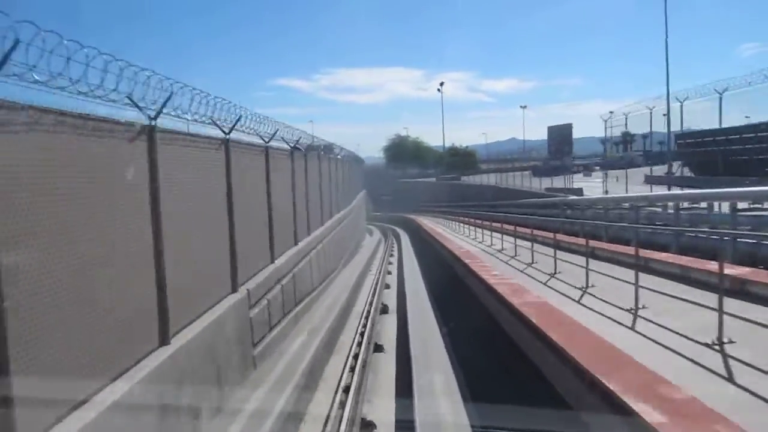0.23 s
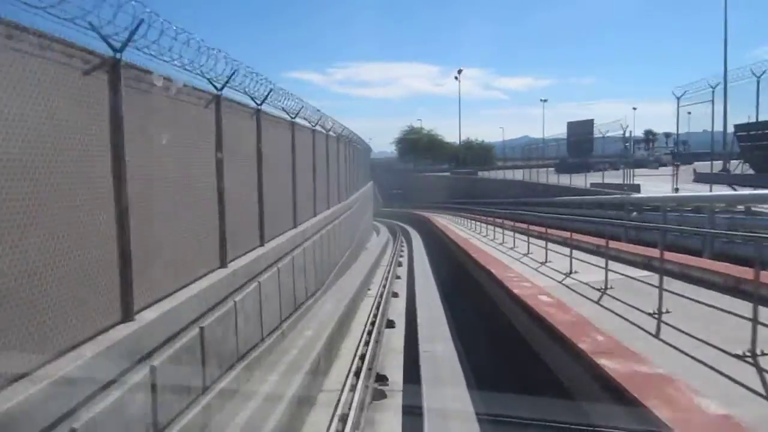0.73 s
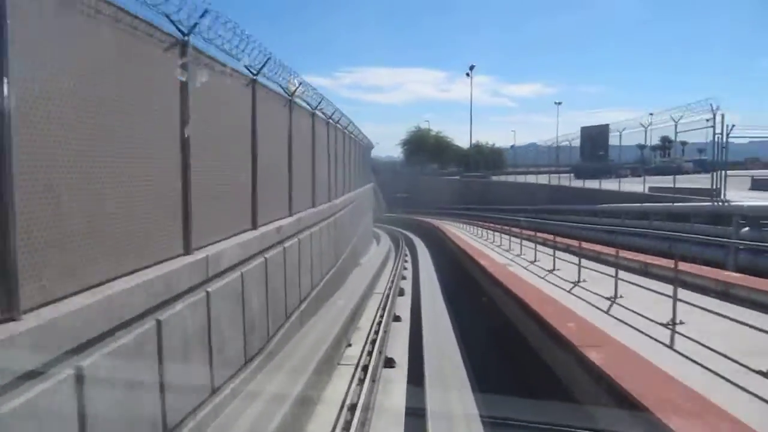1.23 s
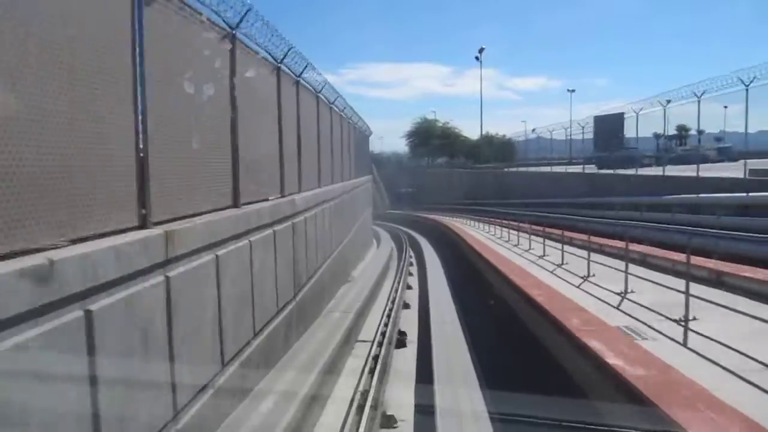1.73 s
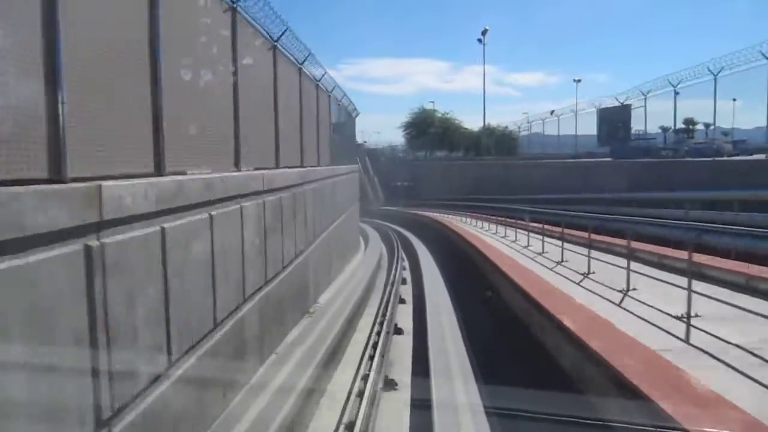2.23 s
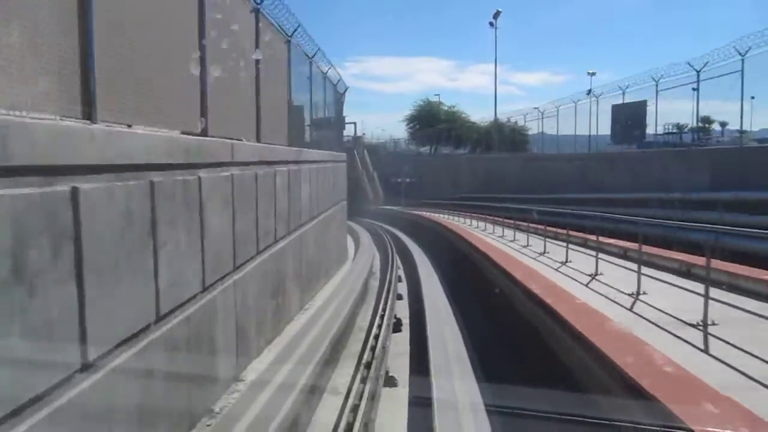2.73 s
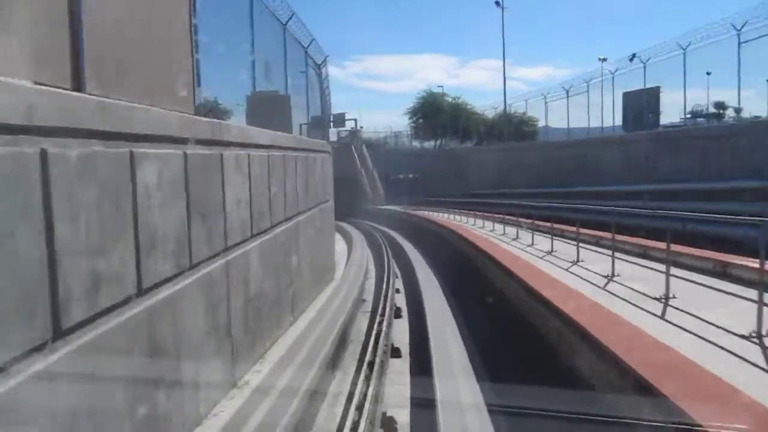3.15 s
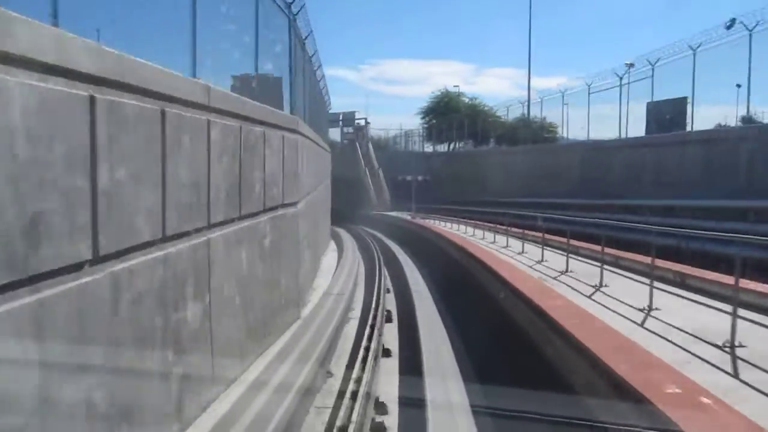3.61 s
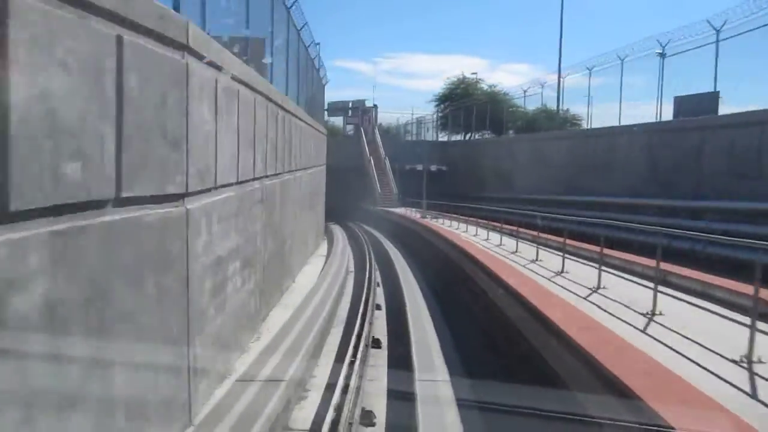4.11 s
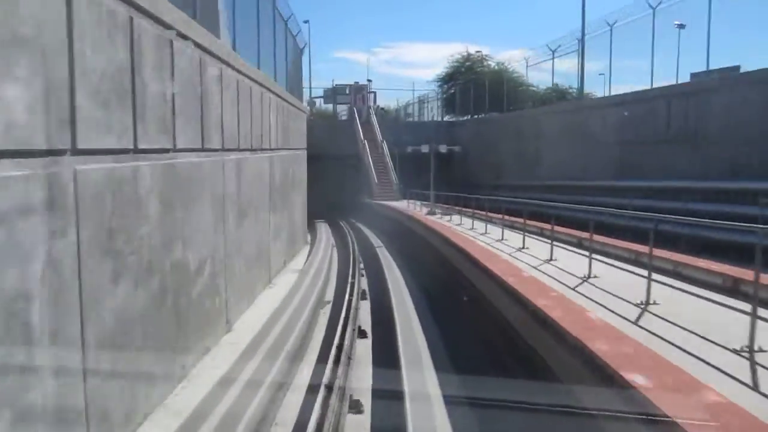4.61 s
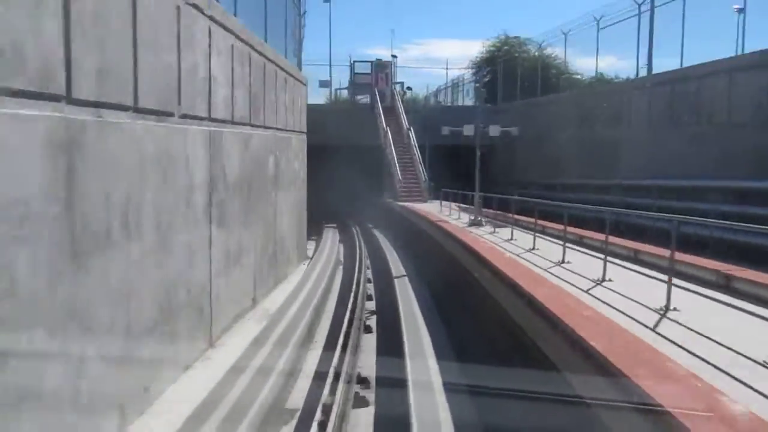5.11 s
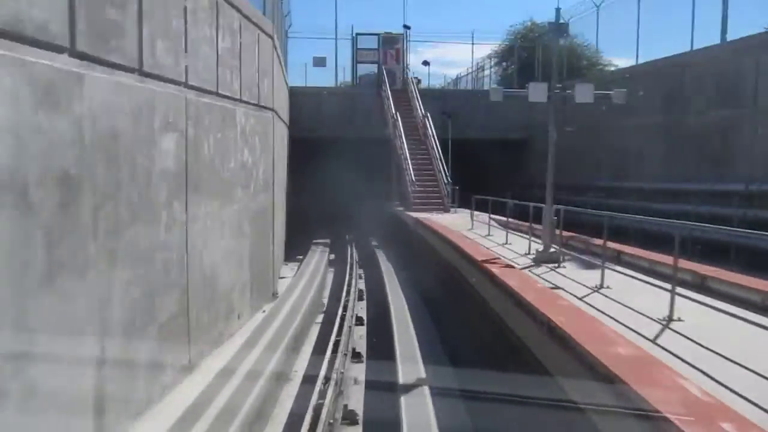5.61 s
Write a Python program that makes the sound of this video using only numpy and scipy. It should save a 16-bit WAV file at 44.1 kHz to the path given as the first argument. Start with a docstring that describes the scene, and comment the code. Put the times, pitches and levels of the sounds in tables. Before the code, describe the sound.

Steady rubber-tyred rolling rumble fills a tram cabin, with a throbbing electric drive whine, airy hiss, small bumps and faint trim ticks.

```python
"""Tyres rolling on a concrete guideway fill the inside of an airport tram at a nearly steady speed.
They shake the body into a deep rumble, raised by a few bumps, and a roar coloured by the cabin's panels.
Air rushes and hisses outside. All these are noises, each shaped by its own spectrum.
The drive gear whines over weaker hums, made of wavering tones that follow the running speed.
A thin steady tone comes from the power electronics; the trim ticks and chirps in short noise bursts."""
import sys
import numpy as np
from scipy import signal
from scipy.fft import rfft, irfft
from scipy.io import wavfile
from scipy.ndimage import uniform_filter1d

SR = 44100
rng = np.random.default_rng(int(sys.argv[2]) if len(sys.argv) > 2 else 0)


def wrap_up_sound(samples):
    """Save the sound to the file named by the first command line argument, as 16-bit audio."""
    columns = np.atleast_2d(samples).T
    # keep every value between -1 and 1, then stretch to whole-number steps
    tamed = np.clip(columns, -1, 1)
    steps = np.round(tamed * 32767).astype(np.int16)
    wavfile.write(sys.argv[1], SR, steps)


N = 258426
TIME, FREQS = np.arange(N) / SR, np.fft.rfftfreq(N, 1 / SR)

# running speed, as the rate at which the gear teeth mesh: (time [s], rate [Hz])
MESH = [(0, 686.8), (.8, 680), (1.5, 681.3), (2.5, 677.6), (3.4, 681.7), (4.4, 680), (5.3, 683),
        (5.86, 674)]
# load on the drive gear, heard as the strength of its whine before throbbing: (time [s], level [dB])
LOAD = [(0, -42), (.48, -28), (.66, -37), (.86, -29.5), (1.3, -31), (1.86, -28), (2.05, -20), (2.25, -24.5),
        (2.88, -22), (3.36, -26), (3.72, -37.5), (3.98, -27.5), (4.86, -30), (4.99, -20.5), (5.08, -33.5),
        (5.22, -23.5), (5.6, -24), (5.78, -37)]
# roughness of the concrete under the tyres: (time [s], roughness above its usual state [dB])
TRACK = [(0, .5), (.3, -0.2), (.6, -0.2), (1.25, -.5), (2.05, 0.8), (2.7, -0.2), (3.3, -.5), (4.3, .5),
         (4.9, 0.35), (5.12, -2.5), (5.45, -.7), (5.86, -0.8)]


def amp(db):
    """Turns decibels into a gain."""
    return 10 ** (np.asarray(db) / 20)


def unit(x):
    """Scales a signal to an rms (average strength) of one."""
    return x / np.sqrt(np.mean(abs(x) ** 2) + 1e-20)


def curve(rows):
    """Joins the points of a time table by straight lines."""
    return np.interp(TIME, *np.transpose(rows))


def shape(points):
    """Spreads a spectrum table over all frequencies, evenly in pitch rather than in Hz."""
    hz, value = np.transpose(points)
    return np.interp(np.log(FREQS + 1), np.log(abs(hz) + 1), value)


def wander(rate_hz):
    """Slow random motion of unit size, mostly below the given rate."""
    spectrum = rfft(rng.standard_normal(N))
    return unit(irfft(spectrum / (1 + (FREQS / rate_hz) ** 2), N))


def cabin_noise(colour_db):
    """Stereo noise of unit level: alike on both sides in the bass, ever less alike in the treble."""
    # likeness of left and right: (frequency [Hz], coherence [-1 to 1])
    likeness = [(30, 0.94), (70, 1), (140, 1), (210, 0.91), (330, 0.99), (700, 0.99), (1170, 0.87),
                (1790, 0.78), (2740, 0.4), (4200, 0.2), (9800, -0.042), (15000, -0.36)]
    left, other = rfft(rng.standard_normal((2, N)))
    same = np.clip(shape(likeness), -.998, .998)
    right = same * left + np.sqrt(1 - same ** 2) * other
    return unit(irfft(np.array([left, right]) * amp(colour_db), N))


def spell(start, length, taper):
    """A smooth swell from zero to one and back; taper is the share of the length spent rising."""
    u = np.clip((TIME - start) / length, 0, 1)
    to_nearest_end = np.minimum(u, 1 - u)
    return np.sin(np.pi / 2 * np.minimum(to_nearest_end / taper, 1)) ** 2


def tone(hz, flutter, flutter_hz):
    """A wavering tone of unit level: flutter (0-1) spreads a share of it close around its pitch."""
    share = np.clip(flutter, 0, 1)
    scatter = unit(wander(flutter_hz) + 1j * wander(flutter_hz))
    sway = np.sqrt(1 - share ** 2) + share * scatter
    turns = np.cumsum(hz * np.ones(N)) / SR + rng.random()
    return unit((sway * np.exp(2j * np.pi * turns)).real)


def rumble():
    """The car body booms on its tyres, more on rough concrete; a bump pushes it harder for a moment."""
    # colour of the boom: (frequency [Hz], relative level per Hz [dB])
    boom_colour = [(6, -38), (13, -14), (21, -4.5), (33, 0), (50, -1.5), (70, 0.5), (98, 1.5), (124, -4),
                   (140, -6.5), (165, -14.5), (230, -31.5), (500, -65)]
    usual_db, follow = -17.5, 1.36  # level on usual track, and dB per dB of roughness
    boom = cabin_noise(shape(boom_colour))
    # even out the slow swells over about 0.2 s, so that the track sets them
    boom /= np.sqrt(uniform_filter1d(boom[0] ** 2, size=9000))
    return boom * amp(usual_db + follow * curve(TRACK) + bump_jolts_db())


def roar():
    """Tyre noise on concrete, coloured by resonances of the cabin and gear housing."""
    # colour before the resonances: (frequency [Hz], relative level per Hz [dB])
    tyre_colour = [(90, -32), (170, 1.5), (195, 0), (210, 4), (230, 1.5), (290, -0.5), (325, -5), (370, -2),
                   (560, -1), (740, -3), (790, -4), (1100, -6), (1600, -12.5), (3000, -47.5)]
    # resonances, mostly lifting the roar: (centre [Hz], width at half the lift [Hz], lift [dB])
    panels = [(189, 37, 2.5), (213, 12.6, -5.5), (255, 12, -2), (293, 17, 3), (381.4, 47, 7), (678, 35, 8),
              (733.3, 20, 7.5), (1140, 63, -3), (1380, 125, 6), (1730, 89, 5.5), (2043, 260, 16.5)]
    usual_db, follow = -23, 0.88  # level on usual track, and dB per dB of roughness
    lift_db = sum(db / (1 + (2 * (FREQS - hz) / width) ** 2) for hz, width, db in panels)
    return cabin_noise(shape(tyre_colour) + lift_db) * amp(usual_db + follow * curve(TRACK))


def air_rush():
    """Slightly gusty air rushing along the car, its level also following the track."""
    # colour of the rush: (frequency [Hz], relative level per Hz [dB])
    rush_colour = [(500, -27), (1300, -6.5), (2200, 4.5), (3200, 2), (4300, -1.5), (5100, -4.5),
                   (6200, -4.5), (7400, -9.5), (10500, -14.5), (12400, -21.5), (14000, -42), (15700, -45)]
    usual_db, follow = -33.5, 0.93  # level on usual track, and dB per dB of roughness
    gusts_db = 0.5 * wander(rate_hz=20)
    return cabin_noise(shape(rush_colour)) * amp(usual_db + follow * curve(TRACK) + gusts_db)


def air_hiss():
    """Spells of soft, finer, high hiss, with a quick random flutter in level."""
    # spells: (start [s], length [s], level at full swell before flutter [dB])
    hisses = [(-.15, 0.68, -41), (2.705, 0.31, -38.5)]
    # colour of the hiss: (frequency [Hz], relative level per Hz [dB])
    hiss_colour = [(2000, -20), (3300, -1), (4200, 12.5), (5300, 1), (9000, 0), (11500, -5), (13500, -2),
                   (15700, -14)]
    swell = sum(amp(db) * spell(start, length, taper=0.38) for start, length, db in hisses)
    return cabin_noise(shape(hiss_colour)) * swell * amp(1.1 * wander(rate_hz=40))


def gear_whine():
    """Meshing gear teeth whine, louder under load; they press unevenly, so the whine throbs."""
    throb_db, throb_hz = 1.43, 7.4
    level_db = curve(LOAD) + throb_db * wander(throb_hz)
    return amp(level_db) * tone(curve(MESH), flutter=0.16, flutter_hz=16)


def gear_octave():
    """A rough tone at twice the mesh rate, growing as the car leans into the curve."""
    full_db, at_whine_db = -39, -26  # level at full lean when the whine has the second level
    follow = 0.39  # dB per dB of whine
    curve_s, straight_share = 2.2, 0.25  # time to full lean, and the gain share at the start
    lean = np.interp(TIME, [0, curve_s], [straight_share, 1])
    level_db = full_db + follow * (curve(LOAD) - at_whine_db)
    return amp(level_db) * lean * tone(2 * curve(MESH), flutter=0.77, flutter_hz=11)


def tread_hum():
    """The tyre tread hums, swelling and fading, its pitch in step with the running speed."""
    # strength of the hum: (time [s], level [dB])
    tread_level = [(0, -42), (.17, -28), (.5, -37.5), (.95, -27), (1.27, -42), (1.58, -28.5), (2.45, -37.5),
                   (2.9, -31), (3.4, -46), (3.75, -30), (4.45, -39), (4.85, -28.5), (5.12, -36.5),
                   (5.45, -26), (5.86, -40)]
    tread_order = .5223  # multiple of the mesh rate
    return amp(curve(tread_level)) * tone(tread_order * curve(MESH), flutter=0.34, flutter_hz=7)


def turning_hums():
    """Tones that turn with the wheels and motor, at fixed multiples of the mesh rate."""
    # hums: (multiple of the mesh rate, level [dB], flutter [0 to 1])
    hums = [(0.032, -32.5, 0.8), (.061, -40, 0), (.0915, -30.5, 0.38), (.131, -28.5, 0.86),
            (0.1746, -28.5, 0.79), (.346, -43.5, 0.25), (.388, -41.5, 0.38), (.581, -41.5, 0.77),
            (.678, -42.5, 0.6), (.727, -43, 0.66), (0.8169, -38, 0.48), (.872, -50, 0.55),
            (.921, -45, 0.64), (1.1834, -50.5, 0.4), (1.543, -56, 0.45), (1.82, -49, 0.7),
            (2.09, -45.5, 0.79)]
    mesh = curve(MESH)
    return sum(amp(db) * tone(k * mesh, flutter, flutter_hz=4.4) for k, db, flutter in hums)


def inverter():
    """A thin tone of steady pitch from the power electronics, stronger on the right."""
    pitch_hz, level_db = 3085, -54.5
    side_db = np.array([[-2.5], [2.5]])  # left, right
    return amp(level_db + side_db) * tone(pitch_hz, flutter=0.34, flutter_hz=3)


def trim():
    """Loose trim rubs, ticks and chirps in short, mostly narrow bursts of noise."""
    # bursts: (start [s], length [s], centre [Hz], width 6 dB down [Hz], level at full swell [dB])
    bursts = [(0.187, .06, 9900, 500, -51), (.79, .17, 9700, 1500, -51), (2.956, 0.14, 2790, 150, -40.5),
              (3.045, .04, 13500, 500, -57), (3.408, 0.063, 9810, 350, -47), (4.222, 0.042, 7260, 400, -41),
              (4.293, 0.0034, 9000, 7000, -32)]
    out = np.zeros((2, N))
    for start, length, hz, width, db in bursts:
        ring_db = -20 * np.log10(1 + ((FREQS - hz) / width * 2) ** 2)
        out += amp(db) * spell(start, length, taper=0.15) * cabin_noise(ring_db)
    return out


def bump_jolts_db():
    """Bumps in the running surface, each a brief swell in dB that lifts the rumble."""
    # bumps: (middle of the bump [s], height of the swell before its taper [dB])
    bumps = [(.35, 3.5), (.97, 6), (1.45, 2), (2.9, 2.5), (4.875, 4)]
    bump_s = 0.22
    # with a taper above one half, the swell turns back just short of its full height
    return sum(db * spell(middle - bump_s / 2, bump_s, taper=0.54) for middle, db in bumps)


def scene():
    """Everything heard at the front window of the car."""
    rolling = rumble() + roar()
    air = air_rush() + air_hiss()
    drive = gear_whine() + gear_octave() + tread_hum() + turning_hums() + inverter()
    return rolling + air + drive + trim()


def record(dry):
    """Two microphones: sound reaches the right one later; both have a deep treble notch and a top limit."""
    # balance of the pair: (frequency [Hz], left minus right [dB])
    balance = [(25, -0.5), (60, 0.5), (125, -0.4), (500, -0.5), (1200, -0.7), (2400, -1), (4400, -0.5),
               (9000, 0.7)]
    lag_s = 7e-5
    notch_hz, notch_width_hz, edge_hz = 8180, 2970, 15720
    tilt_db = shape(balance) / 2
    late = np.exp(-2j * np.pi * FREQS * lag_s)
    ports = np.array([amp(tilt_db), amp(-tilt_db) * late])
    pair = irfft(rfft(dry) * ports, N)
    notched = signal.lfilter(*signal.iirnotch(notch_hz, notch_hz / notch_width_hz, fs=SR), pair)
    low_pass = signal.firwin(1023, edge_hz, window=("kaiser", 9), fs=SR)
    return signal.oaconvolve(notched, low_pass[None], "same")


dry = scene()
out = record(dry)
wrap_up_sound(out)
```